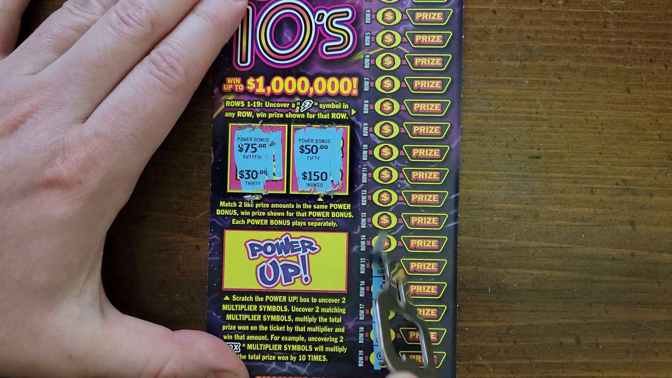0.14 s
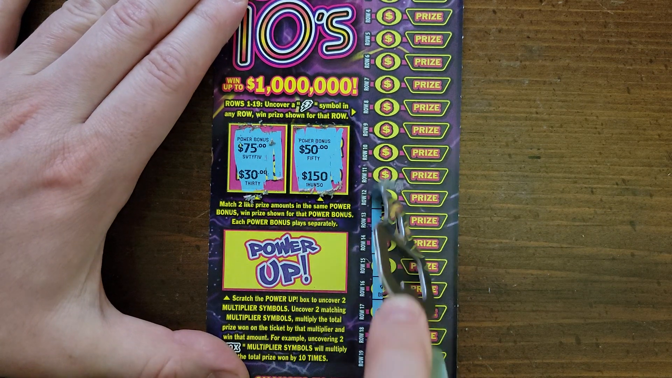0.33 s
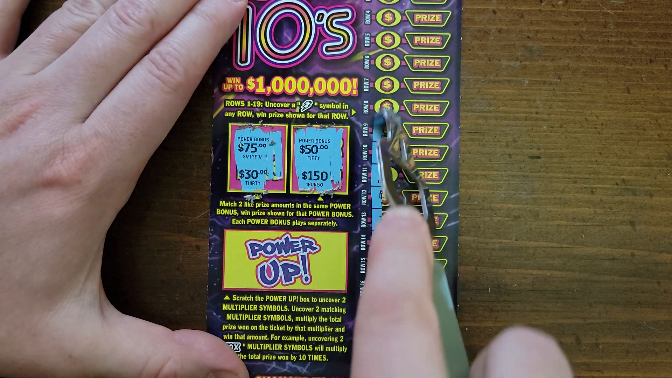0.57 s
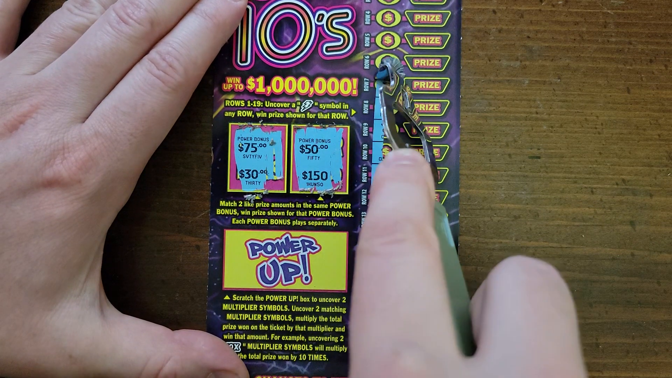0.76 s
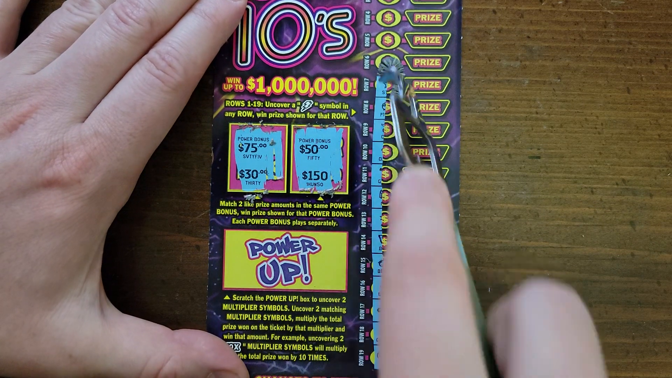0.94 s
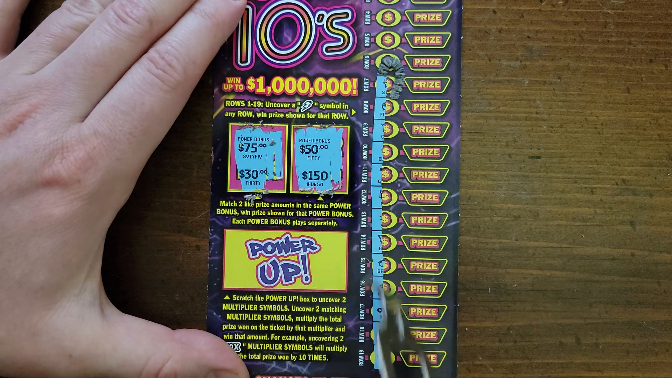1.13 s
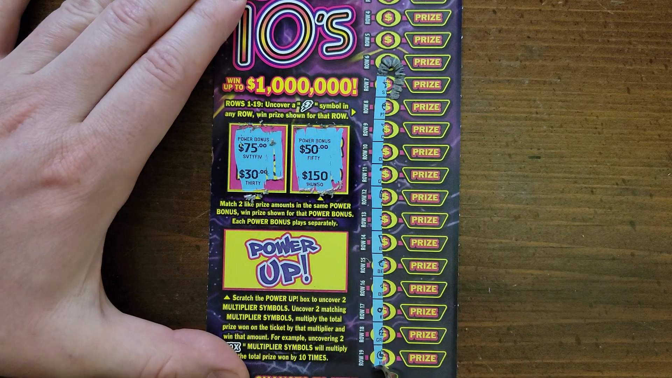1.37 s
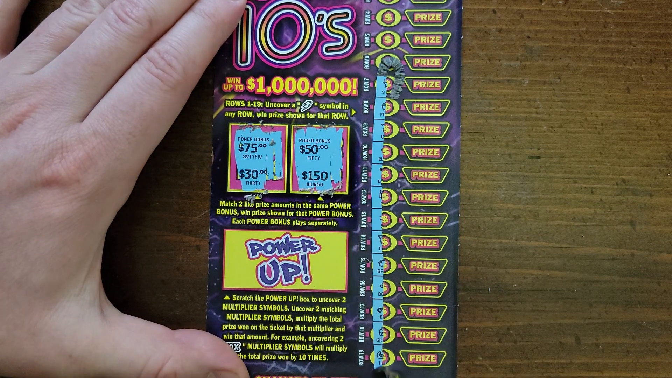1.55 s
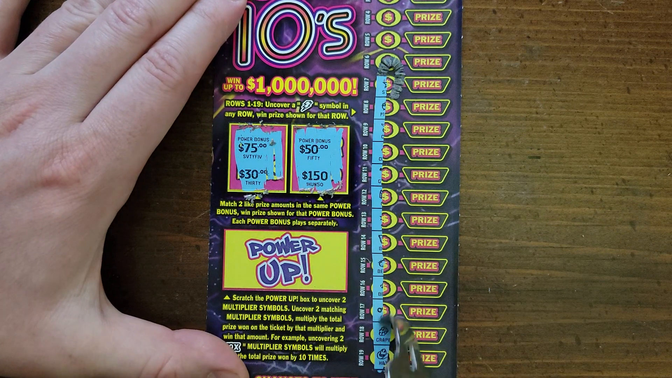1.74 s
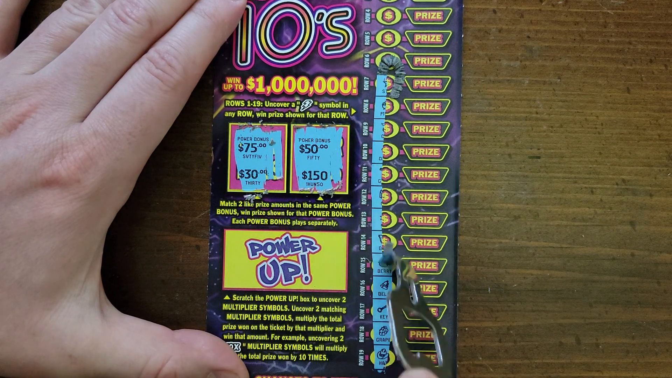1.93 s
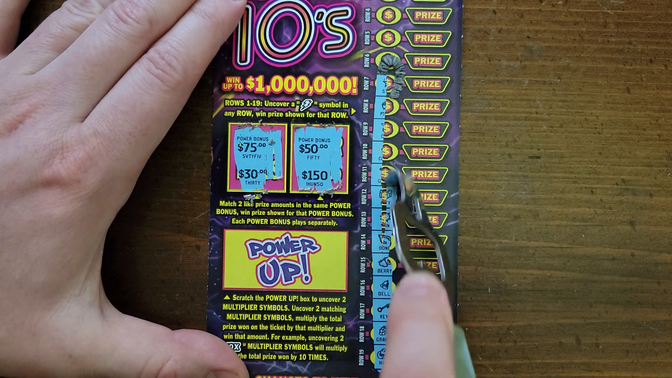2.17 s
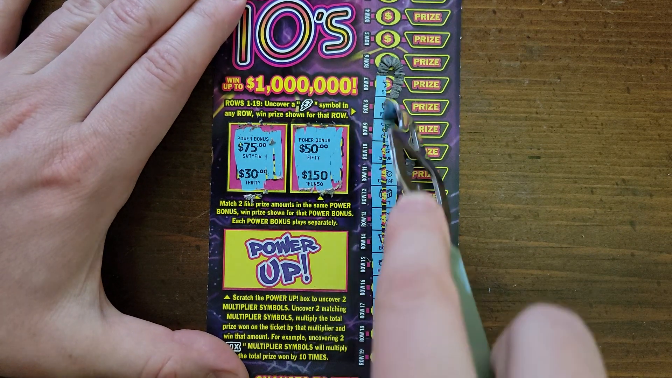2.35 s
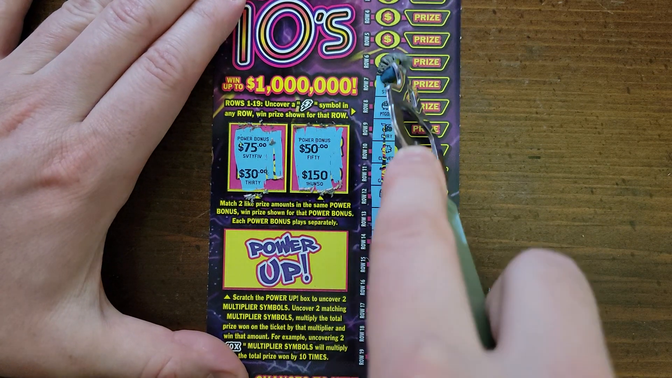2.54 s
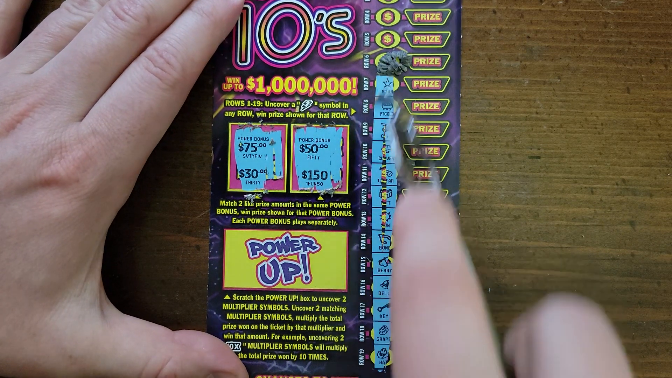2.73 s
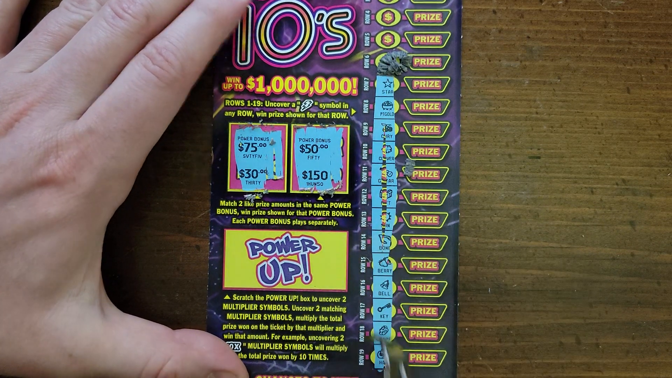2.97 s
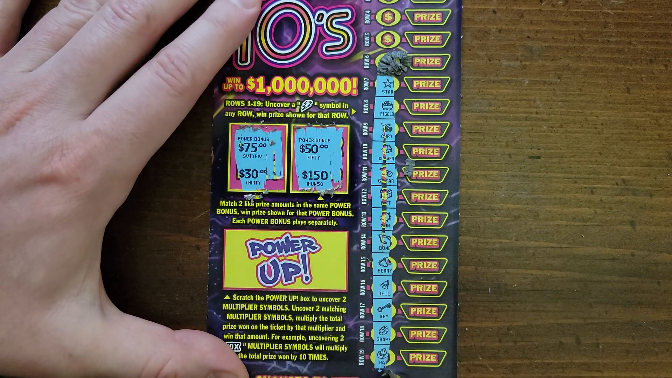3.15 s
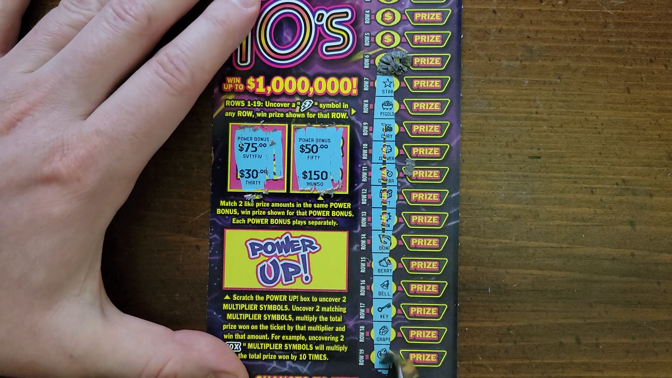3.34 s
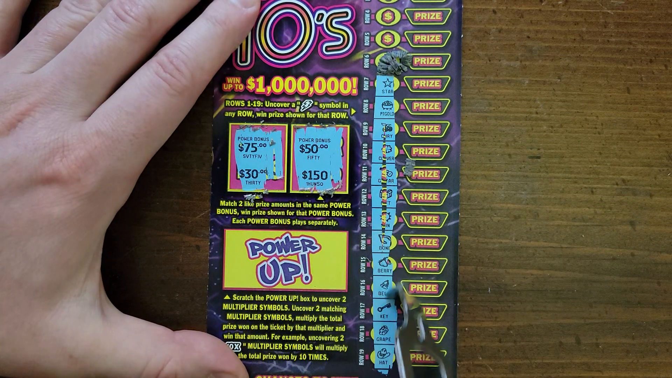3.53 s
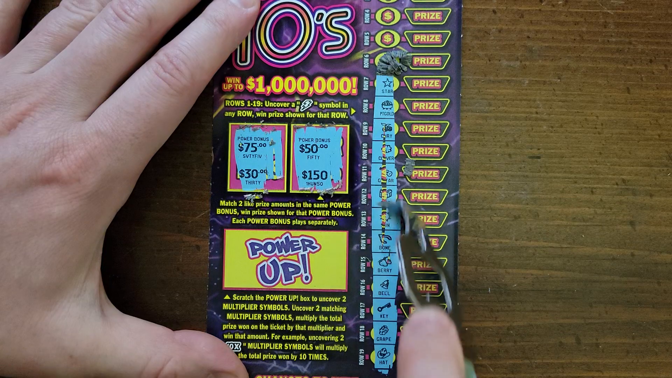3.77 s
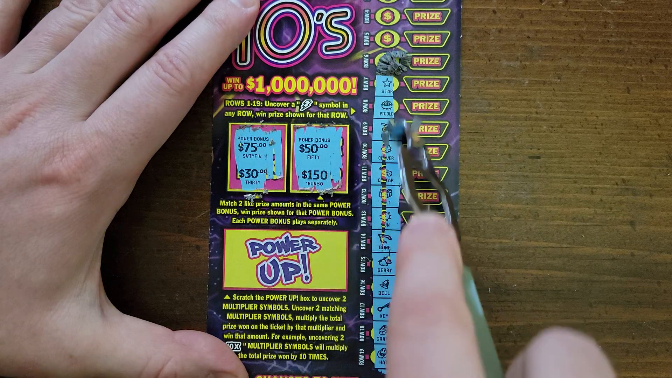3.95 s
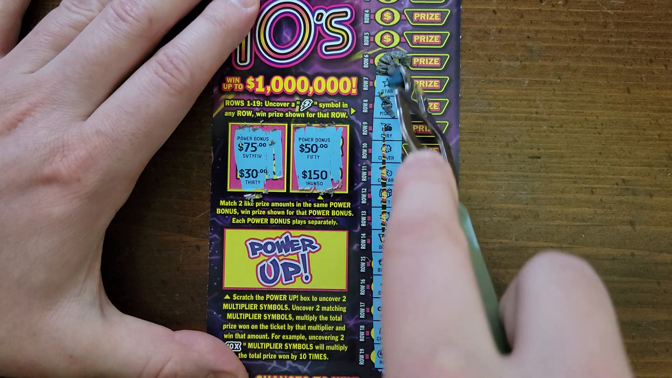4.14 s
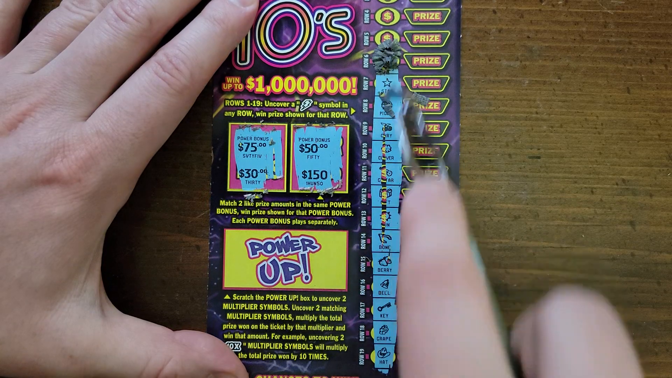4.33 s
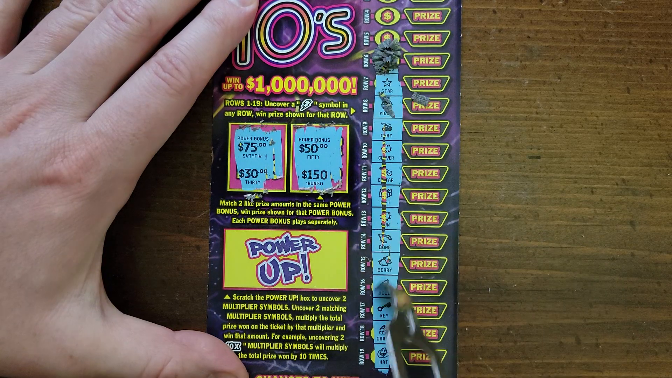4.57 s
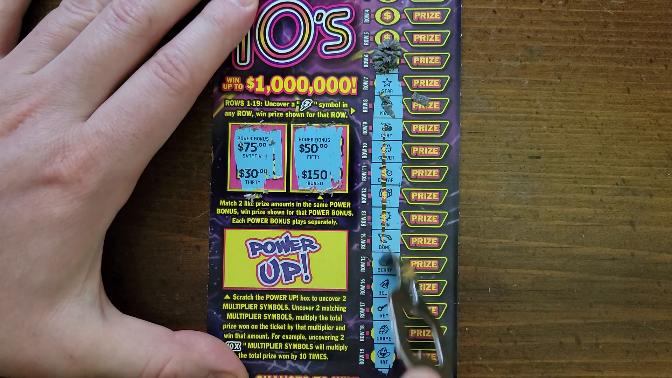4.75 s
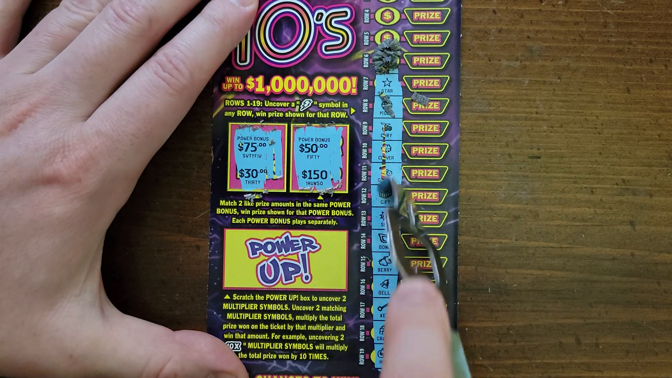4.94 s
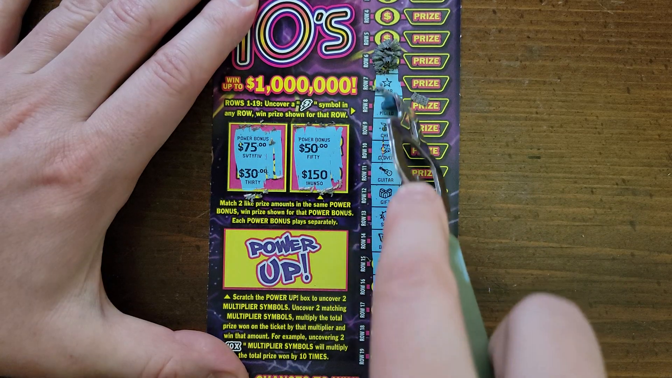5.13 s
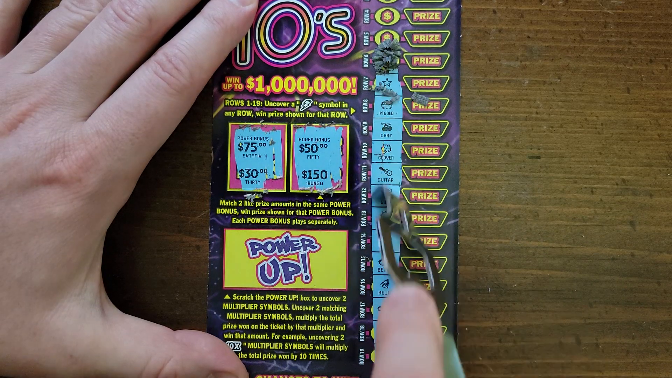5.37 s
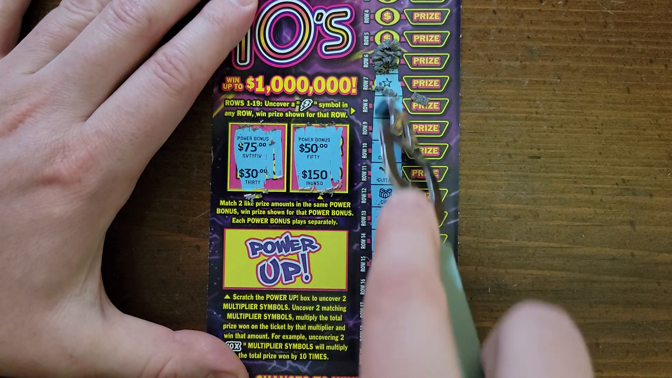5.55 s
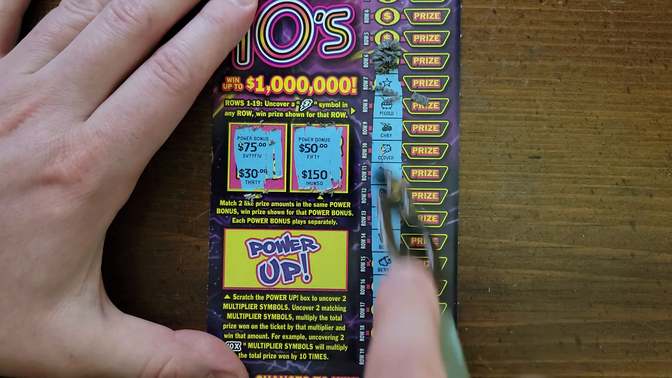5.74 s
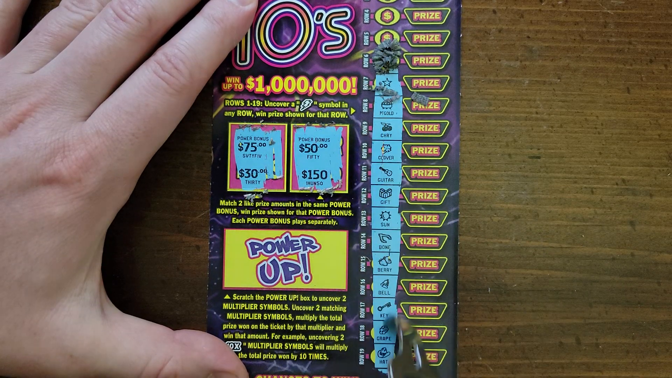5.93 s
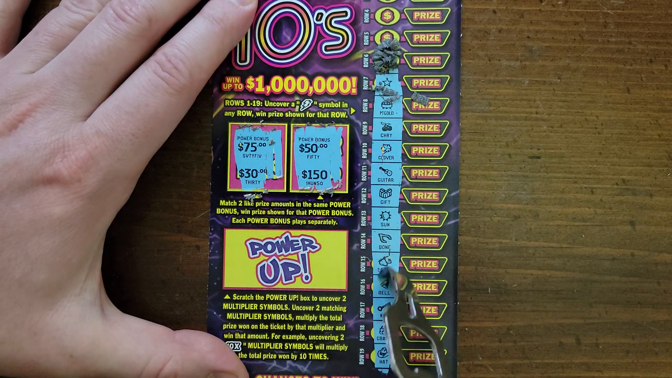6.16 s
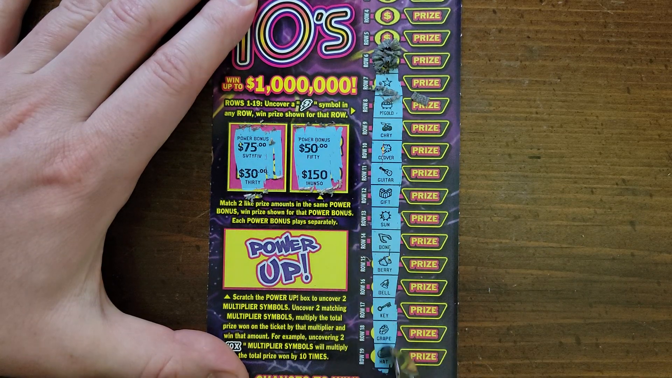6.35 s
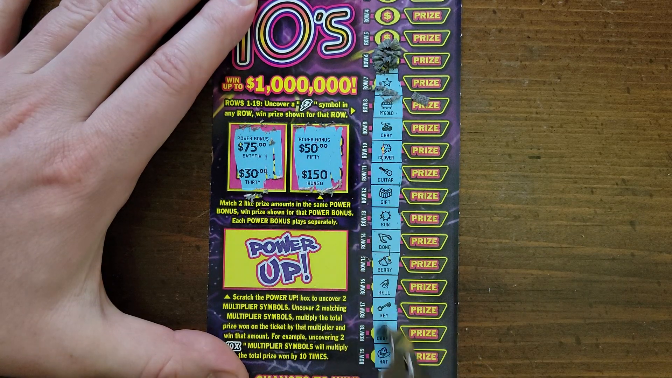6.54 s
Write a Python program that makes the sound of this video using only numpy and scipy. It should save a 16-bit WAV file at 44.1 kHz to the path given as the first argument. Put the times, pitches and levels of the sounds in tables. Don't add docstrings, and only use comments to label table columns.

```python
import sys
import numpy as np
from scipy import signal
from scipy.fft import rfft, irfft
from scipy.io import wavfile
from scipy.ndimage import uniform_filter1d

SR = 44100
rng = np.random.default_rng(int(sys.argv[2]) if len(sys.argv) > 2 else 0)


def elevation(decibels):
    levels = np.asarray(decibels, float)
    return 10 ** (levels / 20)


def generate_wav(sig):
    pcm = np.round(np.clip(np.atleast_2d(sig).T, -1, 1) * 32767).astype(np.int16)
    wavfile.write(sys.argv[1], SR, pcm)


N = 291060

# (frequency [Hz], density [dB per Hz])
RUMBLE_SPECTRUM = [(12, -53), (20, -27), (32, -21.5), (43, -0.5), (65, 4.5), (74, -13), (86, -10.5),
                   (117, -10), (138, -6), (156, -19.5), (226, -10.5), (258, -20), (295, -18.5),
                   (323, -23.5), (700, -43.5), (910, -72.5), (1540, -120)]
RUMBLE_DB = -50
# (frequency [Hz], density [dB per Hz])
HISS_SPECTRUM = [(290, -26), (500, 2), (640, -5), (819, -5.5), (1480, -15.5), (3980, -27.5), (5880, -33.5),
                 (7420, -31), (8450, -44.5), (16000, -32.5)]
HISS_DB = -69
# (frequency [Hz], likeness [-1 to 1])
LIKENESS = [(20, .995), (130, .985), (290, .7), (640, -.3), (1400, -.4), (3100, -.1), (7000, 0)]
# (frequency [Hz], width [Hz], level [dB rms])
ROOM_MODES = [(31, 11, -64.5), (59.5, 6.6, -59), (219.25, 6.5, -64.5), (290.7, 13, -75),
              (357.3, 7.4, -69.5), (448, 6.3, -86.5)]
# (time [s], level [dB])
LEANS = [(0, -44), (.7, -44.5), (.92, -46), (1.32, -44.5), (1.89, -45.5), (3.99, -43.5), (4.61, -44),
         (4.869, -44), (5.18, -48), (5.59, -39.5), (5.78, -43.5)]
REST_DB, LEAN_DB_PER_S = -55, 121
# (frequency [Hz], t60 [s])
ROOM_T60 = [(150, 0.27), (400, 0.37), (1040, 0.24), (2760, 0.2), (3600, 0.23), (4500, 0.18), (7280, 0.16)]
# (frequency [Hz], width [Hz], depth [0-1])
PHONE_DIPS = [(2060, 59, 0.05), (2530, 5.8, 1), (8290, 170, 0.2), (10740, 860, 0.45), (13600, 550, 0.16)]
# (frequency [Hz], width [dB], left-right [dB])
PORTS = [(117.8, -19, 0.5), (296, -3, 8), (738, 1.5, -6.5), (1290, -2, -1), (3000, 1, -1.5), (9050, 3.5, 0)]

# (time [s], blow [dB], contact time [ms], left lag [ms])
KNOCKS = [
    (1.3117, -23, 0.16, 0.25),
    (3.0962, -35, 0.36, 0.29),
    (4.613, -26.5, 0.18, 0.21),
]
# (frequency [Hz], level [dB], t60 [s])
WOOD_MODES = [(131, -2.5, 0.088), (202, -5.5, 0.13), (337, -2.5, 0.028), (469, -8.5, 0.15),
              (558, 2.5, 0.011), (790, -11.5, 0.045), (1053, 2, 0.022), (1204, 0.5, 0.023),
              (1544, -18, 0.029), (1760, -5.5, 0.024), (1850, -9.5, 0.02), (2850, 1.5, 0.037),
              (3210, 3.5, 0.027), (3520, -23, .04)]

STEEL_HZ, STEEL_WIDTH_HZ = 9910, 69
TICK_S = (1.3113, 1.314, 2.692, 2.991, 3.004, 3.004, 3.0043, 3.0943, 3.096, 3.1003, 4.6137, 4.6158, 5.163,
          5.304, 5.321, 5.846, 5.85, 5.859, 5.872, 6.394)
# (peak [dB], frequency [Hz], width [Hz], left-right [dB])
TICKS = [(-36, 8000, 5100, -4.5), (-44, 12800, 6700, 10), (-76, STEEL_HZ, 80, -11), (-55, 2300, 180, -2),
         (-33, 4700, 5600, 0), (-46, 2270, 300, 7), (-44.5, 1540, 340, 5), (-41, 8100, 5000, 6),
         (-61, 2500, 3000, -3), (-45, 7100, 4000, -10), (-44.5, 6300, 2900, 1), (-42, 12400, 5600, -9),
         (-61, 10400, 3000, -10), (-46, 3500, 1100, 3), (-41, 6400, 5000, 3), (-51, 7500, 2500, 3),
         (-72, 12500, 2000, -1), (-55, 6800, 2000, 2), (-54, 5900, 2800, 0), (-63, 830, 500, 3)]

# (time [s], pressure of the edge [dB], bite into the coating [dB])
STROKES = [
    [(-.12, -41, -51.5), (.16, -41.5, -50), (.19, -42.5, -42), (.46, -41.5, -40.5), (.53, -39.5, -48),
     (.6, -40.5, -46), (.7, -39, -47), (.77, -45, -62)],
    [(1.603, -66, -60), (1.67, -47, -49.5), (1.79, -43, -44), (1.92, -42.5, -44.5), (2.04, -41, -42.5),
     (2.16, -41.5, -38.5), (2.4, -42.5, -43.5), (2.47, -43.5, -54.5), (2.56, -46, -59.5)],
    [(3.305, -64, -65), (3.34, -58, -52), (3.43, -43.5, -52), (3.6, -49, -47), (3.63, -42.5, -47),
     (3.8, -49.5, -44), (3.9, -47, -48.5), (4.05, -40, -46.5), (4.21, -47, -58)],
    [(4.74, -76, -79), (4.765, -55, -74), (4.8, -51, -54), (4.9, -47.5, -45), (5.02, -49, -45),
     (5.07, -54, -54), (5.16, -65.5, -74)],
]
STROKE_DUST_DB = (0, 0, 1, 1)
# (extra boom [dB], landing speed share [0-1])
STROKE_LANDING = [(-3.5, 1), (0.5, 1), (1.5, 0.76), (-3, 0.46)]
LAND_DB_PER_S, LIFT_DB_PER_S = 1502, 558
# (time [s], half length [s], loss [dB])
STALLS = [
    (0.17, 0.0085, 0),
    (1.957, 0.033, 5),
    (2.089, 0.029, 1.5),
    (3.845, 0.044, 0.5),
    (4.834, 0.029, 3),
]
STALL_STEEPNESS, STALL_BITE = 1.6, 3.6
# (start [s], end [s], rasp [dB], bite [dB])
FAINT_RASPS = [
    (1.294, 1.33, -64.5, -87),
    (2.986, 3.016, -73, -75),
    (2.996, 3.011, -68, -65),
    (4.599, 4.626, -64, -86),
]

# (full from [s], full until [s], pressure [dB], bite [dB], singing of the steel [dB])
RUBS = [
    (5.313, 5.33, -53.5, -59.5, -64),
    (5.506, 5.586, -52.5, -60.5, -80),
    (5.724, 5.958, -52.5, -59.5, -76),
    (6.082, 6.133, -53.5, -63.5, -102),
    (6.267, 6.326, -56.5, -66.5, -84),
    (6.422, 6.466, -56.5, -73.5, -100),
    (6.575, 6.65, -55.5, -65.5, -86),
]
RUB_RISE_DB_PER_S, RUB_FALL_DB_PER_S, RUB_TRAIL_DB_PER_S = 299, 259, 83
RUB_BITE, RUB_DUST_DB, RUB_DULL_DB_PER_S = 1.8, -0.5, 42
STEEL_SAG_DB_PER_S = 90
# (time [s], half length [s], gain [dB])
CATCHES = [(5.302, 0.0058, 4), (5.322, 0.0095, 6.5), (5.54, .015, 1), (5.58, 0.018, 3.5),
           (5.745, .03, -1.5), (5.84, 0.015, 5), (5.866, 0.022, 6), (6.126, 0.027, 2), (6.312, 0.031, 3.5),
           (6.4, 0.01, 3.5), (6.446, .03, 2), (5.97, 0.018, -1), (6.155, 0.013, 6.5)]
CATCH_BITE = 1.97
# (frequency [Hz], gain [dB])
LIGHT_COLOUR = [(1080, -0.5), (1310, -7.5), (1850, 3), (2600, 0), (3800, 1), (4600, -1.5), (5300, 2),
                (7000, 0), (10200, -1), (11000, -13), (13000, -1)]
LIGHT_FROM_S, LIGHT_JUDDER = 5.23, 1.8

BOOM_DB, BOOM_SHARE = -53, 0.078
PUSH_BOOM_DB, PULL_BOOM_DB = 0, 7
BOOM_LEAD_S, BOOM_LAG_S = 0.0034, 0.018
LANDING_DB, LANDING_FADE_DB_PER_S = 8.5, 50
FIZZ_DB, FIZZ_SHARE, FIZZ_KNEE_DB, FIZZ_STARVE = -55, 0.21, -50, 0.91

BANDS_HZ = (150, 700, 2000, 5000, 10500, 14900, 17000)
# (frequency [Hz], density [dB per Hz])
RASP_SPECTRUM = [(90, -28.5), (200, -12), (600, -13), (760, -9.5), (1080, -4), (1750, -10.5), (2200, -13.5),
                 (3200, -11), (4000, -13.5), (4600, -24.5), (6300, -17), (8200, -30), (9700, -24.5),
                 (11000, -28), (12300, -26.5), (15500, -28.5)]
# (time [s], place [0 near end - 1 far end])
PLACE = [(0, 0.3), (.8, 0.99), (1.3, 0.13), (1.7, 0.049), (2.0, 0.35), (2.6, 0.97), (3.25, 0.027),
         (3.8, 0.36), (4.25, 1), (4.65, 0.045), (4.8, 0.063), (5.2, 0.87), (5.45, 0.44), (5.65, 0.92),
         (5.82, 0.55), (6.0, 0.02), (6.12, 0.071), (6.22, 0.089), (6.31, 0.23), (6.39, 0.26), (6.46, 0.29),
         (6.53, 0.24), (6.6, 0.31)]
# (frequency [Hz], width [Hz], level [dB], node [rad], left-right [dB], left lead [rad])
SHEET_MODES = [(368.7, 20, 8.5, 1.93, 4, -1), (428.6, 11, 7, 3, 3, -1), (787, 34, 5, 1.83, 1.5, 1.5),
               (1542, 256, -13.5, 1.36, 16, 2), (4590, 490, 7.5, 0.3, 1.5, -2.5),
               (5140, 790, 0, 3, -13, -0.5), (7330, 170, -4, 0, -3, 5), (13340, 2100, -2, 2.5, 2, 0),
               (521, 23.7, 10, 2.5, -3.5, -2.5), (1165, 32, -5.5, -0.2, 9, -5.5),
               (1066, 48, 2, -0.87, 18, -1), (1222, 45, 0, 0.58, 26, -3), (1442, 50, -0.5, 2.5, 12.5, 2.5),
               (1729, 148, 7.5, 1.97, -3, 1.65),
               (2330, 44, -9.5, 2.5, -2.5, 13), (2726, 87, 7.5, 1.29, -15, 14.5),
                (2910, 32, 10, 0.58, 13, -3), (3080, 79, -3.5, 0.57, -20, 7.5),
                (3620, 34.2, 6, -0.044, 6, -0.5), (3800, 104, -15, 2.3, -3, -3),
                (5260, 140, 10.5, -0.15, -6.5, 0), (10850, 3200, -13, 2.15, -7, 0)]
SAG_HZ, SAG_UNDER_HZ = 120, 1200
# (time [s], pitch [Hz])
FLAP_HZ = [(0, 3380), (.2, 3230), (.47, 3100), (.53, 3500), (.62, 3900), (.72, 3730), (.8, 3300),
           (1.6, 3570), (1.85, 3460), (2.05, 3400), (2.15, 3300), (2.25, 3180), (2.42, 3520), (2.6, 3000),
           (3.3, 3450), (3.5, 3500), (3.63, 3800), (3.8, 3650), (3.95, 2870), (4.3, 2850), (4.8, 3800),
           (4.92, 3600), (5.02, 3800), (5.15, 3400), (5.3, 3630), (5.34, 3160), (5.6, 3000), (5.73, 3630),
           (5.8, 3320), (5.87, 4400), (5.95, 3370), (6.12, 3200), (6.3, 3130), (6.45, 2870), (6.6, 3400)]
# (time [s], level [dB])
SEATING = [(0, -0.5), (.2, 1), (.45, 0), (.6, -2.5), (.78, 1), (1.6, 6.5), (1.9, -3.5), (2.1, -4), (2.4, 0),
           (2.6, -6), (3.3, 8), (3.5, 1.5), (3.75, -2), (3.95, -3), (4.25, 3.5), (4.8, -3), (5.15, -7),
           (5.33, -2.5), (5.55, -2.5), (5.75, -4), (5.89, 1), (6.11, -3), (6.31, 5.5), (6.45, -0.5),
           (6.6, 4)]
TOOL_SEATING = -0.13
# (time [s], flap [dB], grip [dB])
LOOSENESS = [(0, 2, 4.5), (.2, 2.5, -1.5), (.35, -0.5, -2), (.5, 2, 1), (.65, -9, 1.5), (.8, -8, -1.5),
             (1.6, 1, 1), (1.8, -6, 7), (2.0, -2, -3), (2.25, -1, -8), (2.45, -1.5, -0.5), (3.3, -3, -0.5),
             (3.55, -2, 3.5), (3.8, -6, -1), (3.95, -6, -2), (4.1, -2.5, 3.5), (4.25, -5, -2),
             (4.8, 1.5, 1.5), (5.1, -9, 0), (5.33, 1, -5.5), (5.55, 3, 0), (5.75, 1, -2), (5.9, -8, -4),
             (6.1, 2.5, -5), (6.31, -6, 9.5), (6.45, -1, 0), (6.6, -1, 7)]
# (time [s], level [dB])
TIP_FREEDOM = [(0, 3), (.3, -7), (.55, -1.5), (.8, 0), (1.6, 2.5), (1.8, 0.5), (2.05, -2.5), (2.25, -2.5),
               (2.45, -3), (2.6, -3), (3.3, 0.5), (3.55, -1), (3.8, -0.5), (4.0, 2), (4.25, -4), (4.8, -3),
               (4.95, 0.5), (5.15, -2), (5.33, 2), (5.6, -4), (5.85, -2), (6.6, -4.5)]
SHAFT_UNDER_HZ, TIP_OVER_HZ = 2100, 6000
TOOL_HZ = (1410, 1715, 1990, 2755, 4200, 6300, 8800, 9680, 10080, 12270, 14480)
# (width [Hz], near end [dB], far end [dB], left-right [dB], left lead [rad])
TOOL_MODES = [(39.9, -1.5, -9.5, 7.5, 0.54), (44.8, -3, 10, 1.5, 0.55), (59.3, 1.5, -8.5, 10.5, 0.38),
              (68.6, -2, -4, 3, 0.8), (149, -2.5, -5, 16, 0.68), (90.5, 4.5, -11.5, -0.5, 0.72),
              (496, 7, -12, -2.5, 0.33), (249, -15, 6.5, -8.5, 0.36), (350, 4.5, -7.5, -5.5, .5),
              (170, -9.5, 16, -1, 0.41), (250, 11, 6, 2, .5)]
AIR_NEAR_DB, AIR_FAR_DB = -10.5, 4
HAND_NEAR_HZ, HAND_FAR_HZ, HAND_WIDTH_HZ, HAND_DEPTH = 11700, 10350, 600, 0.53


def evened(x):
    return x / np.sqrt(np.mean(x ** 2) + 1e-20)


def read(points, hz):
    f, value = np.transpose(points)
    return np.interp(np.log(hz + 1), np.log(f + 1), value)


def curve(rows):
    s, *columns = np.transpose(rows)
    return np.array([np.interp(np.arange(N) / SR, s, c) for c in columns])


def hold_db(start_s, end_s, rise, fall):
    t = np.arange(N) / SR
    return np.minimum(0, np.minimum(rise * (t - start_s), fall * (end_s - t)))


def ring(x, hz, width_hz):
    r = np.exp(-np.pi * width_hz / SR)
    return 2 * signal.lfilter([1 - r], [1, -r * np.exp(2j * np.pi * hz / SR)], x)


def rung_twice(x, hz, width_hz):
    return ring(ring(x, hz, width_hz).real, hz, width_hz)


def pair(z, pan_db, lead_rad):
    left = (z * np.exp(1j * lead_rad)).real
    return np.array([left * elevation(pan_db / 2), z.real * elevation(-pan_db / 2)])


def noise_pair(points):
    hz = np.fft.rfftfreq(N, 1 / SR)
    a, b = rfft(rng.standard_normal((2, N)))
    same = read(LIKENESS, hz)
    other = same * a * np.exp(.3j) + np.sqrt(1 - same ** 2) * b
    return evened(irfft(np.array([a, other]) * elevation(read(points, hz)), N))


def fractures(per_s, spread_db):
    size = elevation(spread_db * np.minimum(rng.exponential(1, N), 4)) * rng.choice([-1, 1], N)
    return evened(size * (rng.random(N) < per_s / SR))


def leaning_db():
    swells = [db + hold_db(s, s, LEAN_DB_PER_S, LEAN_DB_PER_S) for s, db in LEANS]
    return np.maximum(REST_DB, np.max(swells, axis=0))


def background():
    rumble = elevation(RUMBLE_DB) * noise_pair(RUMBLE_SPECTRUM) * elevation([[.3], [-.3]])
    air = rng.standard_normal(N)
    hum = sum(elevation(db) * evened(rung_twice(air, f, width).real) for f, width, db in ROOM_MODES)
    shake = evened(rung_twice(air, 123.5, 30).real) * elevation(leaning_db() - 4.5)
    hiss = elevation(HISS_DB) * noise_pair(HISS_SPECTRUM)
    return rumble + hum + shake + hiss


def room(x):
    taps = np.zeros((2, SR // 2))
    jitter = rng.integers(0, 20, (2, (SR // 2 - 61) // 20))
    at = np.arange(60, SR // 2 - 20, 20) + jitter
    np.put_along_axis(taps, at, rng.choice([-1., 1.], at.shape), 1)
    hz, t, z = signal.stft(taps, SR, nperseg=256)
    decay = elevation(-60 * t / read(ROOM_T60, hz)[:, None])
    tail = signal.istft(z * decay, SR, nperseg=256)[1]
    return signal.fftconvolve(x, tail / np.linalg.norm(tail[0]), axes=1)[:, :N]


def near_in_bass(x):
    hz = np.fft.rfftfreq(N, 1 / SR)
    left, right = rfft(x)
    width_db = read([(f, width) for f, width, _ in PORTS], hz)
    lean = elevation(read([(f, lean_db) for f, _, lean_db in PORTS], hz) / 2)
    mid, side = (left + right) / 2, (left - right) / 2 * elevation(width_db)
    return irfft((mid + np.array([side, -side])) * np.array([lean, 1 / lean]), N)


def shadowed(x):
    hz = np.fft.rfftfreq(N, 1 / SR)
    gain = np.ones(len(hz))
    for f, width, depth in PHONE_DIPS:
        gain *= 1 - depth / (1 + (2 * (hz - f) / width) ** 2)
    return irfft(rfft(x) * gain, N)


def knocks():
    out, t = np.zeros((2, N)), np.arange(11000) / SR
    wood = np.zeros(len(t))
    for k, (f, db, t60) in enumerate(WOOD_MODES):
        wood += (-1) ** k * elevation(db - 60 * t / t60) * np.sin(2 * np.pi * f * t)
    scatter = rng.standard_normal((len(KNOCKS), 2, len(t))) * (1 - np.exp(-t / 0.0024))
    scatter *= elevation(15.0 - 60 * t / 0.032) + elevation(-33.0 - 60 * t / 0.24)
    for (s, db, contact_ms, lag_ms), jumble in zip(KNOCKS, scatter):
        at = int(s * SR)
        late_ms = 1000 * (t[:600] + at / SR - s) - np.array([[lag_ms], [0]])
        v = late_ms / contact_ms - 3
        contact_samples = contact_ms * SR / 1000
        push = -v * np.exp(-v ** 2 / 2) / contact_samples
        push += elevation(-17.5) * np.exp(-(4 * v) ** 2 / 2) / contact_samples
        blow = signal.fftconvolve(push, wood + jumble, axes=1)[:, :len(t)]
        out[:, at:at + len(t)] += elevation(db) * blow
    return out


def ticks():
    out = np.zeros((2, N))
    bursts = rng.standard_normal((len(TICKS), 1200)) * elevation(-60 * np.arange(1200) / SR / 0.0065)
    for s, (db, f, width, pan_db), burst in zip(TICK_S, TICKS, bursts):
        z = rung_twice(burst, f, width)
        out[:, round(s * SR):][:, :len(z)] += pair(elevation(db) * z / abs(z).max(), pan_db, 0.31)
    return out


def singing_db():
    rubs = []
    for start, end, _, _, db in RUBS:
        sag_db = hold_db(start, start, 2 * RUB_RISE_DB_PER_S, STEEL_SAG_DB_PER_S)
        rubs.append(db + sag_db + hold_db(0, end, 1, 2 * RUB_FALL_DB_PER_S))
    return np.max(rubs, axis=0)


def steel():
    drive = fractures(per_s=3000, spread_db=5.5) * elevation(singing_db())
    return elevation(29.5) * pair(ring(drive, STEEL_HZ, STEEL_WIDTH_HZ), -3.4, 1.0)


def fizz_of(bite_db):
    return FIZZ_DB + FIZZ_SHARE * (bite_db + 43.5) + FIZZ_STARVE * np.minimum(bite_db - FIZZ_KNEE_DB, 0)


def stroke_contacts():
    t = np.arange(N) / SR
    stall_db = sum(db * np.clip(STALL_STEEPNESS * (1 - abs(t - s) / half), 0, 1) for s, half, db in STALLS)
    for rows, dust_db, (land_db, share) in zip(STROKES, STROKE_DUST_DB, STROKE_LANDING):
        press_db, bite_db = curve(rows) - [stall_db, STALL_BITE * stall_db]
        start, end = rows[0][0], rows[-1][0]
        land_rate = share * LAND_DB_PER_S
        landing_db = LANDING_DB + land_db - LANDING_FADE_DB_PER_S * np.maximum(t - start, 0)
        boom_db = BOOM_DB + BOOM_SHARE * (press_db + 50.0) + np.clip(landing_db, 0, None)
        boom_db += hold_db(start - BOOM_LEAD_S, end + BOOM_LAG_S, land_rate, LIFT_DB_PER_S)
        touch_db = hold_db(start, end, land_rate, LIFT_DB_PER_S)
        fizz_db = fizz_of(bite_db) + dust_db
        yield np.array([boom_db, press_db + touch_db, bite_db + touch_db, fizz_db + touch_db])


def rub_contacts():
    t = np.arange(N) / SR
    catch_db = sum(db * np.clip(1 - abs(t - s) / half, 0, 1) for s, half, db in CATCHES)
    for k, (start, end, press_db, bite_db, _) in enumerate(RUBS):
        speed_db = hold_db(start, end, RUB_RISE_DB_PER_S, RUB_FALL_DB_PER_S)
        if k == 0:
            trail_db = hold_db(start, end, RUB_RISE_DB_PER_S, RUB_TRAIL_DB_PER_S)
            trail_db += hold_db(0, end + .075, 1, 2 * RUB_FALL_DB_PER_S)
            speed_db = np.maximum(speed_db, trail_db)
        wear_db = CATCH_BITE * catch_db + RUB_BITE * speed_db
        wear_db -= RUB_DULL_DB_PER_S * np.maximum(t - start, 0)
        boom_db = press_db + speed_db + (PULL_BOOM_DB if k % 2 else PUSH_BOOM_DB)
        rasp_db = press_db + speed_db + catch_db
        yield np.array([boom_db, rasp_db, bite_db + wear_db, fizz_of(bite_db) + RUB_DUST_DB + wear_db])


def contact():
    out = np.full((4, N), -120.)
    for levels in (*stroke_contacts(), *rub_contacts()):
        out = np.maximum(out, levels)
    for start, end, rasp_db, bite_db in FAINT_RASPS:
        levels = np.array([[rasp_db + 8], [rasp_db], [bite_db], [bite_db + 6.0]])
        out = np.maximum(out, levels + hold_db(start, end, 14640, 15000))
    return out


def fracture_drive(place, seat_loose_db):
    hz = np.fft.rfftfreq(N, 1 / SR)
    source = rfft(fractures(per_s=14000, spread_db=1.0)) * elevation(read(RASP_SPECTRUM, hz))
    boom_db, rasp_db, bite_db, fizz_db = contact()
    top_db = fizz_db - 5.5 + 0.39 * np.clip(bite_db + 38.5, -25, 0)
    air_db = top_db - 7.0 + AIR_NEAR_DB + (AIR_FAR_DB - AIR_NEAR_DB) * place
    judder_db = 0.54 * evened(uniform_filter1d(rng.standard_normal(N), size=500))
    judder_db *= np.where(np.arange(N) / SR > LIGHT_FROM_S, LIGHT_JUDDER, 1)
    drive = np.zeros(N)
    levels_db = (boom_db, rasp_db, bite_db, fizz_db - 0.46, top_db, air_db)
    for lo, hi, db in zip(BANDS_HZ, BANDS_HZ[1:], levels_db):
        mask = 1 / np.sqrt((1 + (lo / (hz + 1)) ** 12) * (1 + (hz / hi) ** 12))
        drive += evened(irfft(source * mask, N)) * elevation(db + judder_db)
    turn = np.exp(2j * np.pi * np.cumsum(curve(FLAP_HZ)[0]) / SR)
    flap = turn * ring(ring(drive / turn, 0, 1200), 0, 1200)
    return drive + elevation(-2.0 + seat_loose_db) * flap.real / 2


def paths(x, place, count, t60, direct):
    t, out = np.arange(2000) / SR, np.zeros((2, N))
    for k in range(count):
        jumble = rng.standard_normal((2, len(t))) * elevation(-60 * t / t60)
        jumble /= np.linalg.norm(jumble, axis=1, keepdims=True)
        jumble[[0, 1], [8, 0]] += direct
        near = np.cos(np.pi / 2 * np.clip(place * (count - 1) - k, -1, 1))
        out += signal.oaconvolve((x * near)[None], jumble / np.hypot(1, direct), axes=1)[:, :N]
    return out


def sheet_ring(drive, place, seat_db, grip_db):
    out = np.zeros((2, N))
    sag = np.exp(2j * np.pi * np.cumsum(SAG_HZ * (0.35 - place)) / SR)
    for f, width, db, node, pan_db, lead in SHEET_MODES:
        shape = np.cos(node + 1.41 * np.sqrt(f / 1000) * place)
        if 1600 < f < SHAFT_UNDER_HZ:
            shape = shape * elevation(grip_db)
        elif BANDS_HZ[1] < f < BANDS_HZ[2]:
            shape = shape * elevation(seat_db)
        slide = sag if 900 < f < SAG_UNDER_HZ else 1
        out += elevation(db) * pair(slide * ring(drive * shape / slide, f, width), pan_db, lead)
    return out


def tool_ring(drive, place, seat_db, grip_db):
    out, tip_db = np.zeros((2, N)), curve(TIP_FREEDOM)[0]
    for f, (width, near_db, far_db, pan_db, lead) in zip(TOOL_HZ, TOOL_MODES):
        level_db = near_db + (far_db - near_db) * place + TOOL_SEATING * seat_db
        level_db = level_db + grip_db * (f < SHAFT_UNDER_HZ) + tip_db * (f > TIP_OVER_HZ)
        out += pair(ring(drive * elevation(level_db), f, width), pan_db, lead)
    return out


def lightened(x):
    other = irfft(rfft(x) * elevation(read(LIGHT_COLOUR, np.fft.rfftfreq(N, 1 / SR))), N)
    share = np.clip((np.arange(N) / SR - LIGHT_FROM_S) / .03, 0, 1)
    return x + share * (other - x)


def scrape():
    place, seat_db = curve(PLACE)[0], curve(SEATING)[0]
    loose_db, grip_db = curve(LOOSENESS)
    drive = fracture_drive(place, loose_db)
    out = paths(drive, place, count=7, t60=0.035, direct=0.24)
    out += sheet_ring(drive, place, seat_db, grip_db)
    out += tool_ring(drive, place, seat_db, grip_db)
    hand_hz = HAND_NEAR_HZ + (HAND_FAR_HZ - HAND_NEAR_HZ) * place
    hand = np.exp(2j * np.pi * np.cumsum(hand_hz) / SR)
    out -= HAND_DEPTH * (hand * ring(out / hand, 0, HAND_WIDTH_HZ)).real
    return elevation(-2.0) * lightened(out)


def scene():
    rubbing, blows, flakes = scrape(), knocks(), ticks() + steel()
    wet = room(elevation(-8.0) * rubbing + elevation(-6.5) * blows + elevation(-13) * flakes)
    return shadowed(near_in_bass(rubbing + blows + flakes + wet)) + background()


def top_cut(x):
    return signal.sosfilt(signal.butter(12, 16520, fs=SR, output="sos"), x)


def record(dry):
    lowpass = signal.firwin(801, 15745, window=("kaiser", 4), fs=SR)
    limited = signal.oaconvolve(dry, lowpass[None], "same")
    return top_cut(limited)


dry = scene()
out = record(dry)
generate_wav(out)
```